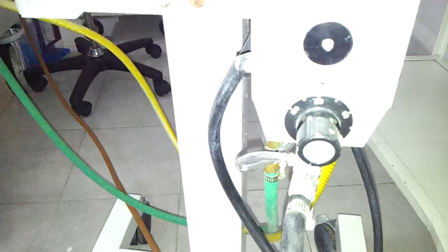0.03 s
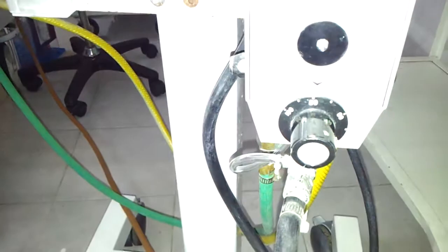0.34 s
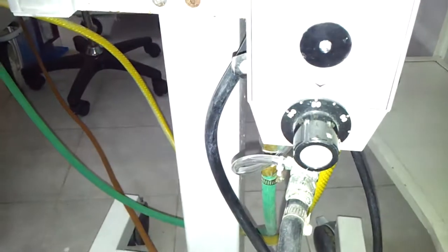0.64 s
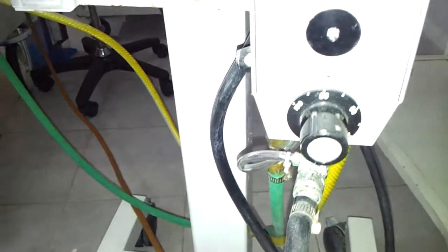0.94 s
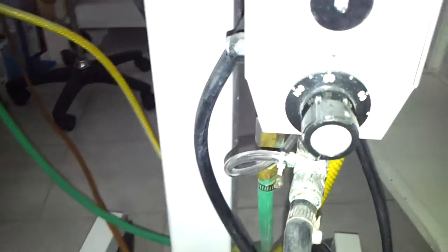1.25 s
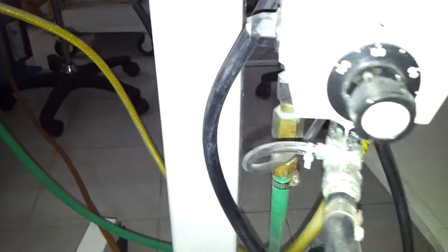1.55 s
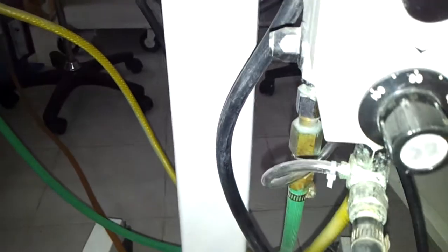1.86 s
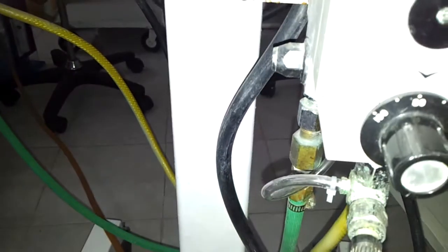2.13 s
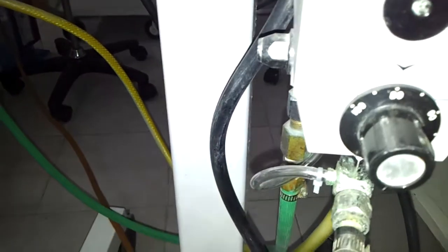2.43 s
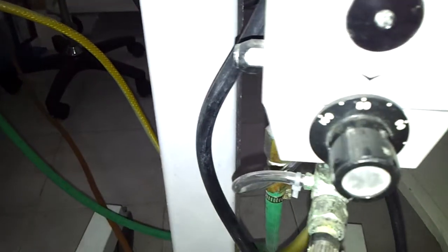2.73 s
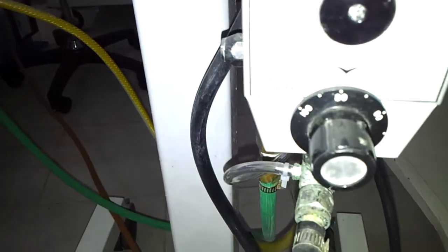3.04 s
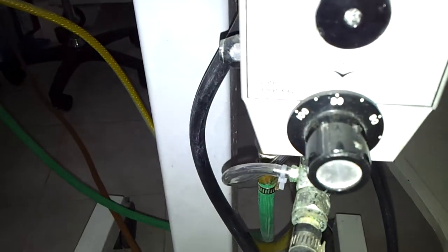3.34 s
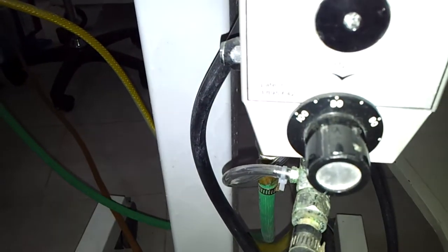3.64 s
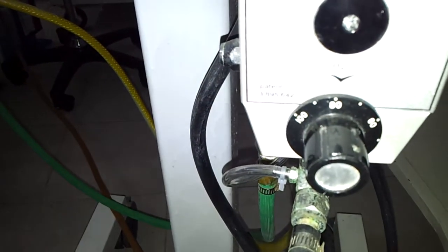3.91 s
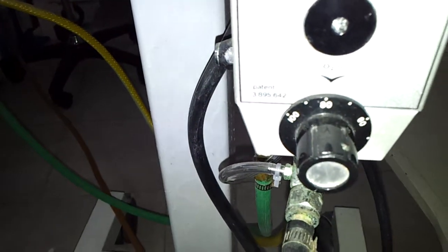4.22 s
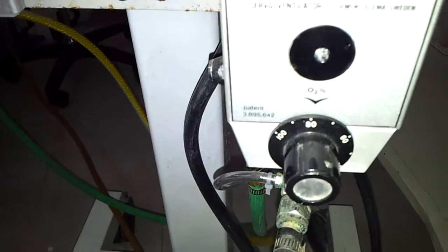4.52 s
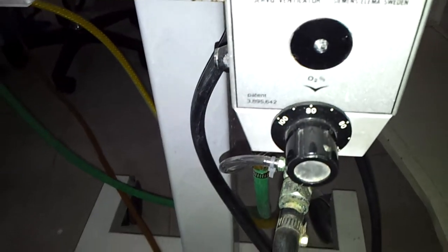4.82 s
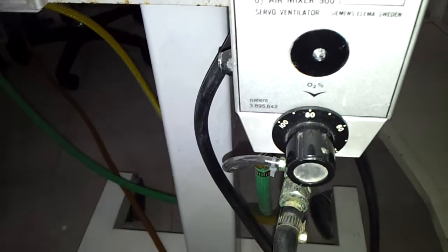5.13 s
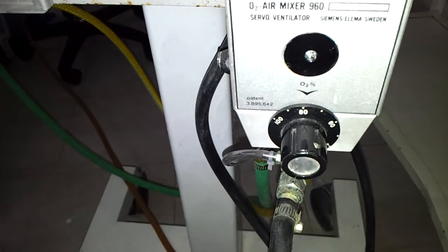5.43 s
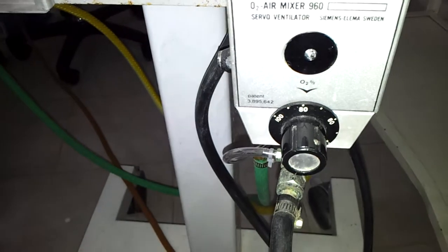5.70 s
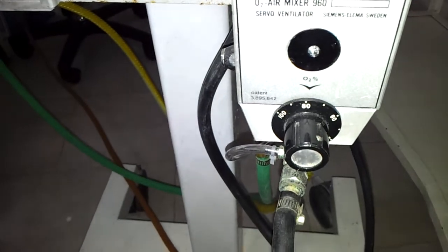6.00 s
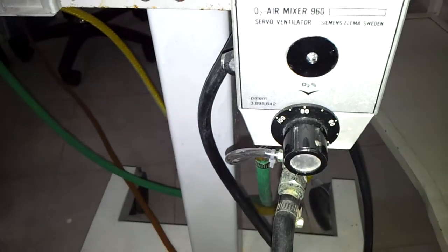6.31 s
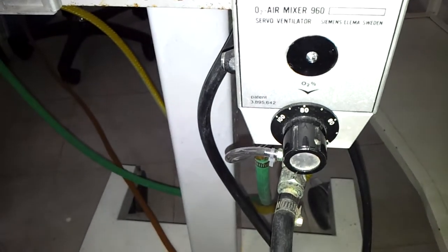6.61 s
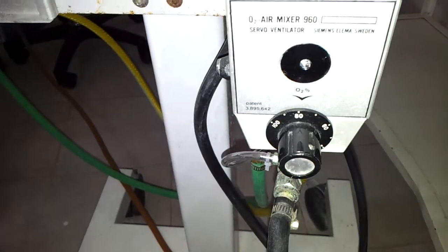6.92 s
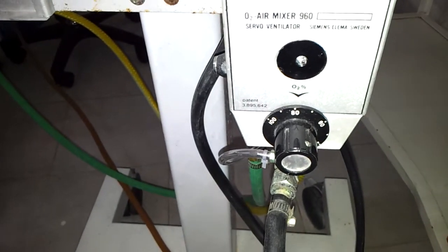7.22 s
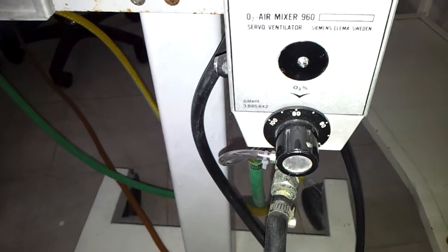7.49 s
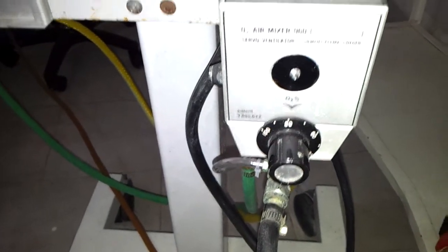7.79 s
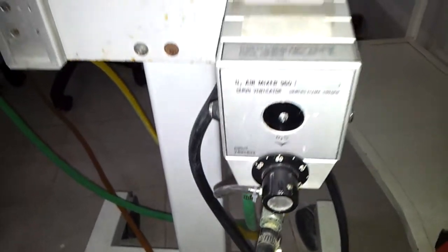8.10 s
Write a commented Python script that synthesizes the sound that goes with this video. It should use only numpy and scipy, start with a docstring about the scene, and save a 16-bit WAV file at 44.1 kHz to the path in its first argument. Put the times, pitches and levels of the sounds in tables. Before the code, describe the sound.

A ventilator's gas mixer runs through two cycles in a small, hard-walled room, heard up close and mostly on the left. Each cycle is a bright, singing hiss of refilling gas, followed at once by a sharp valve spit and a rush of air that dies away with brief whistles. Underneath are a constant leaking hiss, the low hum of a compressor and fan, and occasional faint taps.

```python
"""In a small room, close to a ventilator and its gas mixer. Twice the mixer refills for a second:
a jet of gas hisses and makes the pipes sing. Each time a valve then spits open and dumps gas in a
fading puff with falling whistles. Behind this are a steady leak, faint taps and the hum of a
compressor and a fan. The right microphone is muffled, and the sound fades in."""
import sys
import numpy as np
from scipy import signal
from scipy.fft import rfft, irfft, next_fast_len
from scipy.io import wavfile
from scipy.ndimage import uniform_filter1d

SR = 44100
rng = np.random.default_rng(int(sys.argv[2]) if len(sys.argv) > 2 else 0)


def master(y):
    """Save y as 16-bit WAV."""
    cut = np.clip(np.atleast_2d(y).T, -1, 1)
    pcm = np.round(cut * 32767)  # scale
    wavfile.write(sys.argv[1], SR, pcm.astype(np.int16))


N = 368235
TIME = np.arange(N) / SR
FFT_SIZE = next_fast_len(N, True)
FREQ = np.maximum(np.fft.rfftfreq(FFT_SIZE, 1 / SR), 1)

# Levels in SHAPE, RINGS and PEAKS tables only set the balance between the pitches in that table.
# each refill: start/s, end/s, opening time/s, overshoot/share of the flow,
# jet base level/dB, low pipe level/dB, high pipes level/dB, nozzle tones level/dB
REFILLS = [(2.63, 3.66, 0.025, 0.3, -35, -43, -38.5, -41),
           (6.118, 7.167, 0.052, 0.053, -33.3, -51, -42, -42)]
# hiss of the refill jet: f/Hz, level/dB
REFILL_SHAPE = [(1200, -28), (2000, -18), (3000, -7.5), (4500, -1.5), (5800, -7.5), (7000, -12), (8600, 6),
                (9800, -5), (11500, -0.5), (13500, -6), (14400, -7)]
# notes of the mixer's pipes, lowest first: f/Hz, width/Hz, level/dB
PIPE_RINGS = [(3368, 47, 2.5), (4338, 115, 3), (4980, 70, -18), (5550, 45, -11)]
# broad ringing of the nozzle: f/Hz, width/Hz, level/dB
NOZZLE_RINGS = [(6500, 280, -4.5), (7395, 130, 2.5), (7830, 200, 0), (8440, 170, -5), (8840, 390, 0.5)]
# the nozzle's two purest tones: f/Hz, width/Hz, level/dB
PURE_NOZZLE_RINGS = [(7096, 20, 0), (8215, 50, -4)]
# each opening of the dump valve: t/s, base levels of the spit/dB, jet/dB, outlet rush/dB
# and whistles/dB, whistle pitch/ratio
PUFFS = [(3.688, -25, -26, -31.5, -35.5, 1.008), (7.203, -25.5, -25.5, -31, -31.5, .995)]
# bright ringing of the spit: f/Hz, width/Hz, level/dB
SPIT_RINGS = [(6700, 170, -1.5), (8900, 900, -11), (9900, 1300, -0.5), (11150, 940, -9)]
# ringing of the valve body: f/Hz, width/Hz, level/dB
VALVE_RINGS = [(1233, 280, 6), (3900, 540, 3), (4650, 520, -1)]
# sharp hiss of the puff: f/Hz, level/dB
PUFF_SHAPE = [(4500, -24), (5700, -8), (6500, -5.5), (7200, -4), (8000, 2), (8800, 2), (10000, -10),
              (12000, -11.5), (14400, -31)]
# deeper rush in the outlet pipe: f/Hz, level/dB
OUTLET_SHAPE = [(300, -14), (700, -8), (1000, -0.5), (1300, 3), (1950, -1.5), (2550, 1.5), (3200, -4),
                (4200, 2), (5000, -8.5), (7000, -17.5)]
# ringing of the outlet pipe: f/Hz, width/Hz, level/dB
OUTLET_RINGS = [(1280, 230, -4), (2550, 180, 2), (5500, 400, -4), (6650, 220, -3)]
# whistles in every puff: t after opening/s, length/s, base f/Hz, relative level/dB
WHISTLES = [(.118, 0.019, 12950, -1), (0.267, .024, 11150, -4), (.333, .015, 10920, 0.5),
            (0.392, .015, 6500, 1)]
# one lower whistle, in the first puff only: t/s, length/s, f/Hz, level/dB
LOW_WHISTLE = (4, .021, 5898.5, -35)
# hiss of the leak: f/Hz, level/dB
LEAK_SHAPE = [(290, -44), (500, -14), (806, -7), (1200, -9), (1630, -9.5), (1900, -10.5), (2660, -10),
              (3200, -14.5), (3790, -12.5), (4120, -10.5), (4680, -9.5), (5090, -9.5), (7130, -6),
              (8680, 0.5), (14400, -13.5)]
# hollow, evenly spaced peaks in the leak's hiss, from a nearby panel's echo: f/Hz, width/Hz, level/dB
HOLLOW_PEAKS = [(1654, 170, -3.5), (2530, 340, 4), (3386, 70, 0), (4020, 100, -2.5), (5040, 290, -3.5)]
# breathy tones of the leak: f/Hz, width/Hz, level/dB
LEAK_RINGS = [(6280, 68, -3.5), (6550, 110, 0.5), (6720, 88, -1)]
# faint taps around the machine: t/s, f/Hz, level/dB
TAPS = [(1.095, 806, -45), (4.4, 836, -40), (5.075, 994, -44), (5.117, 1630, -40), (5.371, 1620, -41.5),
        (5.373, 1230, -44), (5.558, 1286, -42), (8.225, 720, -41)]
# tones of the compressor and fan: f/Hz, base level/dB, wobble/dB
HUM_TONES = [(120, -63.5, 2.5), (175.3, -48.5, 1.5), (350.6, -58, 1.5), (409.2, -51.5, 0.9),
             (526.4, -66, 2), (877, -64, 3)]
# the cabinet's two deep tones at rest: f/Hz, level/dB
DRONE_TONES = [(50, -60), (73.5, -61.5)]
# swells of those tones: start/s, end/s, lower rise/dB, upper rise/dB, upper sag/(dB per s)
DRONE_SWELLS = [(.55, 2.6, 15, 18, 7), (5.0, 6.9, 7.5, 1, 0)]
# air noise of the room: f/Hz, level/dB
ROOM_SHAPE = [(20, -1), (40, -0.5), (70, 2), (95, 0), (120, 1.5), (145, -3.5), (200, 0), (280, -1),
              (340, 3), (420, -3), (520, -4), (900, -10), (2000, -20)]
# the microphone moves toward the mixer, then backs away: t/s, distance/m
MIC_PATH = [(1.0, 0.25), (1.3, 0.23), (1.55, .2), (2.2, 0.18), (3.2, 0.23), (4.3, .24), (4.8, 0.27),
            (5.4, 0.28), (7.8, 0.31), (8.35, 0.38)]
# how much the muffling lowers the right side against the left: f/Hz, drop/dB
MUFFLING = [(60, 11), (190, 9.5), (380, 20), (700, 17.5), (1300, 25), (2400, 24), (4400, 31), (6500, 37),
            (8200, 42), (11000, 34), (14500, 34)]


def refills(nozzle_db=-2, jet_db=-2.5, close_s=0.042, settle_s=0.071, flicker_db=0.06, seep_db=-46.5):
    """While the regulator is open, a jet of gas hisses and makes the nozzle and the pipes ring."""
    jet = gain(jet_db) * noise(shape(REFILL_SHAPE)) + gain(nozzle_db) * ring(NOZZLE_RINGS, order=2)
    low_pipe, high_pipes = ring(PIPE_RINGS[:1]), ring(PIPE_RINGS[1:], order=2)
    tones = ring(PURE_NOZZLE_RINGS)
    dropout = bump(2.876, length_s=0.005)  # the regulator catches once
    flow = gain(flicker_db * wander(33)) * (1 - dropout)
    out = 0
    for start, end, opening, overshoot, db, low_db, high_db, tones_db in REFILLS:
        surge = 1 + overshoot * (1 - ramp(start + opening, settle_s))  # opening fast lets extra gas in
        pipes = gain(low_db) * low_pipe + gain(high_db) * high_pipes
        sound = gain(db) * jet + pipes + gain(tones_db) * tones
        out += gate(start, end, opening, close_s) * surge * sound
    # the low pipe starts to sing just before the second refill
    seep = gain(seep_db) * bump(6.07, length_s=0.035) * low_pipe
    return flow * out + seep


def spits(length_s=0.02, lead_s=0.03, snap_s=0.016, body_db=-5):
    """The first gas squeezes through the barely open valve: sudden, short and very bright."""
    spit = ring(SPIT_RINGS) + gain(body_db) * ring(VALVE_RINGS)
    return spit * sum(gain(db) * ramp(t - lead_s, snap_s) * bump(t, length_s) for t, db, *_ in PUFFS)


def puffs(rings_db=-4.5, sizzle_db=-16, surge_db=3, surge_s=0.087, rush_db=-2, sputter_db=0.6):
    """The valve dumps gas: a sharp jet fades with the pressure; the rush in the outlet lasts longer."""
    delay_s, lift_s, hold_s, close_s = 0.011, 0.028, 0.31, 0.17
    linger_s, drain_s = 0.14, 0.28
    jet_sag_db_per_s, rush_sag_db_per_s = 13.5, 9
    jet = noise(shape(PUFF_SHAPE)) + gain(sizzle_db) * ring([(12900, 2000, 0)])
    rush = noise(shape(OUTLET_SHAPE)) + gain(rings_db) * ring(OUTLET_RINGS)
    out = 0
    for t, _, jet_db, outlet_db, *_ in PUFFS:
        lift = t + delay_s
        shut = lift + hold_s + close_s
        age = np.maximum(TIME - lift, 0)
        jet_gain = gain(jet_db - jet_sag_db_per_s * age)
        extra_db = surge_db * (1 - ramp(lift + lift_s, surge_s))
        rush_gain = gain(outlet_db + rush_db + extra_db - rush_sag_db_per_s * age)
        out += gate(lift, shut, lift_s, close_s) * jet_gain * jet
        out += gate(lift, shut + linger_s, lift_s, drain_s) * rush_gain * rush
    return out * gain(sputter_db * wander(120))


def whistles(waver_hz=120, rough_db=4, sink_share=0.015):
    """The slowing jet blows across an edge in short, rough whistles, each sinking in pitch."""
    waver = waver_hz * wander(900)
    roughness = normalize(gain(rough_db * wander(400)))
    notes = [(t + delay, length, hz * pitch, db + puff_db)
             for t, *_, puff_db, pitch in PUFFS for delay, length, hz, db in WHISTLES]
    out = 0
    for t, length, hz, db in notes + [LOW_WHISTLE]:
        falling_hz = hz * (1 - sink_share * (TIME - t) / length)
        out += gain(db) * bump(t, length) * tone(falling_hz + waver)
    return roughness * out


def leak(hiss_db=-37, hollow_db=-46.5, beam_db=-41, off_beam_db=-51, upper_db=-45, flicker_db=0.54):
    """Gas escapes from a fitting all the time and aims its breathy tones at one spot, like a beam."""
    beam_m, beam_width_m = 0.306, 0.051
    in_beam = np.exp(-0.5 * ((mic_distance() - beam_m) / beam_width_m) ** 2)
    hiss = gain(hiss_db + nearness_db(share=0.24) + 0.8 * wander(1.91)) * noise(shape(LEAK_SHAPE))
    hollow = gain(hollow_db + 1.2 * wander(3)) * ring(HOLLOW_PEAKS)
    breathy = np.hypot(gain(beam_db) * in_beam, gain(off_beam_db)) * ring(LEAK_RINGS)
    upper = gain(upper_db + 2.5 * wander(2)) * ring([(8350, 510, 0)])
    return (hiss + hollow + breathy + upper) * gain(flicker_db * wander(14))


def taps(blur_hz=70, decay_s=0.14, attack_s=0.0017, scuff_db=-2):
    """Each soft tap is a scuff and a short note whose pitch is blurred by the room."""
    blur = blur_hz * wander(250)
    scuff = gain(scuff_db) * ring([(1210, 930, 0)], order=2)
    out = 0
    for t, hz, db in TAPS:
        fade_db = -60 * np.clip((TIME - t) / decay_s, 0, 2)
        out += gain(db + fade_db) * ramp(t, attack_s) * (tone(hz + blur) + scuff)
    return out


def motors(speed_wobble=0.00153, drone_wobble_db=1.3, swell_s=0.42):
    """The compressor and fan hum, louder from close by; below them the cabinet's drone swells twice."""
    speed = 1 + speed_wobble * wander(6)
    hum = sum(gain(db + wobble_db * wander(7)) * tone(hz * speed) for hz, db, wobble_db in HUM_TONES)
    lower_db = upper_db = 0
    for start, end, lower_rise, upper_rise, sag in DRONE_SWELLS:
        swell = gate(start, end, swell_s, swell_s)
        lower_db += swell * lower_rise
        upper_db += swell * (upper_rise - sag * (TIME - start))
    drone = sum(gain(db + swell_db + drone_wobble_db * wander(3.6)) * tone(hz * speed)
                for (hz, db), swell_db in zip(DRONE_TONES, (lower_db, upper_db)))
    return gain(nearness_db(share=0.52)) * hum + drone


def rustle_and_rumble(rustle_db=-61, rumble_db=-58):
    """Faint, uneven rustling in the room, and a low rumble that comes and goes."""
    rustle = sum(normalize(gain(3.5 * wander(22))) * ring([(hz, hz / 2, 0)], order=2)
                 for hz in (800, 1500))
    rumble = normalize(gain(4 * wander(4))) * ring([(27, 14, 0)])
    return gain(rustle_db) * rustle + gain(rumble_db) * rumble


def wall_echoes(sound, decay_s=0.24):
    """Hard, close walls send back a blur of echoes that falls by 60 dB in decay_s."""
    age = TIME[:SR // 2]
    tail = rng.standard_normal(len(age)) * gain(-60 * age / decay_s)
    return signal.fftconvolve(sound, tail / np.sqrt(np.sum(tail ** 2)))[:N]


def panel_echoes(sound, delay_s=0.001196, slap_gain=0.028, scatter_gain=0.3):
    """Sound slaps back off the nearest panel and scatters off the cabinet and floor."""
    slap = np.interp(TIME - delay_s, TIME, sound)
    return slap_gain * slap + scatter_gain * wall_echoes(sound, decay_s=0.12)


def mic_distance():
    """Metres from the microphone to the mixer at every moment."""
    return np.interp(TIME, *np.transpose(MIC_PATH))


def nearness_db(share, reference_m=0.3):
    """Closer is louder; share says how much of that change in dB a source gets."""
    return share * 20 * np.log10(reference_m / mic_distance())


def gain(db):
    """Turns decibels into a number to multiply by."""
    return 10 ** (np.asarray(db) / 20)


def normalize(x):
    """Scales a signal to an average strength (rms) of 1."""
    return x / np.sqrt(np.mean(x ** 2))


def shape(points):
    """Joins (f/Hz, level/dB) points into a gain for every frequency."""
    hz, db = np.transpose(points)
    return gain(np.interp(np.log(FREQ), np.log(hz), db))


def noise(gains):
    """The hiss of swirling gas, shaped by a gain for every frequency."""
    return normalize(irfft(rfft(rng.standard_normal(FFT_SIZE)) * gains, FFT_SIZE)[:N])


def ring(peaks, order=1):
    """Hiss that rings at (f/Hz, width/Hz, level/dB) peaks; a higher order makes them steeper."""
    power = sum(gain(db) ** 2 / (1 + ((FREQ - hz * hz / FREQ) / width) ** 2) ** order
                for hz, width, db in peaks)
    return noise(np.sqrt(power))


def wander(rate):
    """A smooth random wobble, about 1 in size, that turns about rate times a second."""
    step = max(int(SR / rate), 1)
    stairs = np.repeat(rng.standard_normal(N // step + 1), step)
    return 1.183 * uniform_filter1d(stairs, step)[:N]


def ramp(start, length):
    """Rises from 0 to 1."""
    return np.clip((TIME - start) / length, 0, 1)


def gate(start, end, attack, release):
    """Opens at start, holds, and is shut again at end."""
    return ramp(start, attack) * (1 - ramp(end - release, release))


def bump(t, length_s):
    """A bell-shaped swell around time t."""
    return np.exp(-0.5 * ((TIME - t) / length_s) ** 2)


def tone(hz):
    """A pure tone that follows a moving pitch."""
    return np.sqrt(2) * np.sin(2 * np.pi * (np.cumsum(hz) / SR + rng.random()))


def scene(room_db=-45, direct_db=-13, echo_db=1, shared_below_hz=300):
    """The left microphone faces the gas; the muffled right one hears it mostly off the walls."""
    gas_and_taps = leak() + refills() + spits() + puffs() + whistles() + taps()
    sources = gas_and_taps + rustle_and_rumble()
    hum = motors()
    air, other_air = (gain(room_db) * noise(shape(ROOM_SHAPE)) for _ in range(2))
    left = rfft(sources + panel_echoes(sources) + hum + air, FFT_SIZE)
    # both sides hear the same bass in the room's air
    shared = 1 / np.sqrt(1 + (FREQ / shared_below_hz) ** 2)
    right_air = shared * rfft(air, FFT_SIZE) + np.sqrt(1 - shared ** 2) * rfft(other_air, FFT_SIZE)
    right_sources = gain(direct_db) * sources + gain(echo_db) * wall_echoes(sources)
    muffle = 1 / shape(MUFFLING)
    right = (rfft(right_sources + hum, FFT_SIZE) + right_air) * muffle
    average_gain = (1 + muffle) / 2
    return irfft(np.array([left, right]) / average_gain, FFT_SIZE)[:, :N]


def record(dry, hiss_db=-58, lift_hz=14400, lift_width_hz=350, lift_db=4, top_hz=14520):
    """The recorder lifts the highest treble, adds faint hiss, fades in and cuts all above top_hz."""
    fade_start_s, fade_s, fade_curve = 0.698, 0.28, 0.92
    lift = gain(lift_db / (1 + (2 * (FREQ - lift_hz) / lift_width_hz) ** 2))
    sound = irfft(rfft(dry, FFT_SIZE) * lift, FFT_SIZE)[:, :N]
    sound += gain(hiss_db) * rng.standard_normal(dry.shape)
    sound *= ramp(fade_start_s, fade_s) ** fade_curve
    return signal.sosfilt(signal.ellip(14, 0.1, 80, top_hz, fs=SR, output="sos"), sound)


dry = scene()
out = record(dry)
master(out)
```